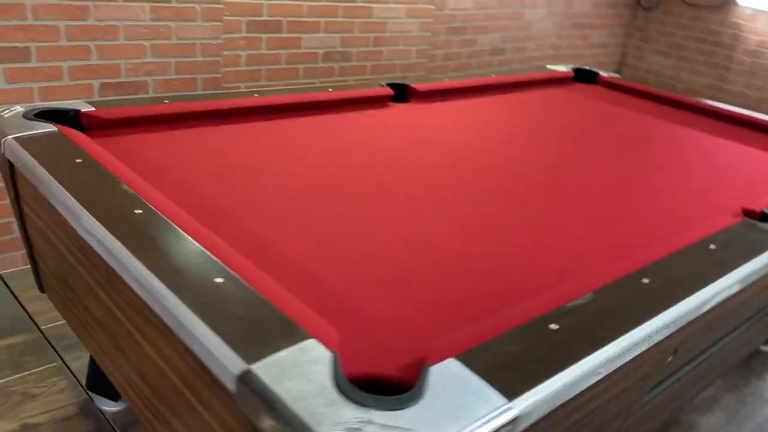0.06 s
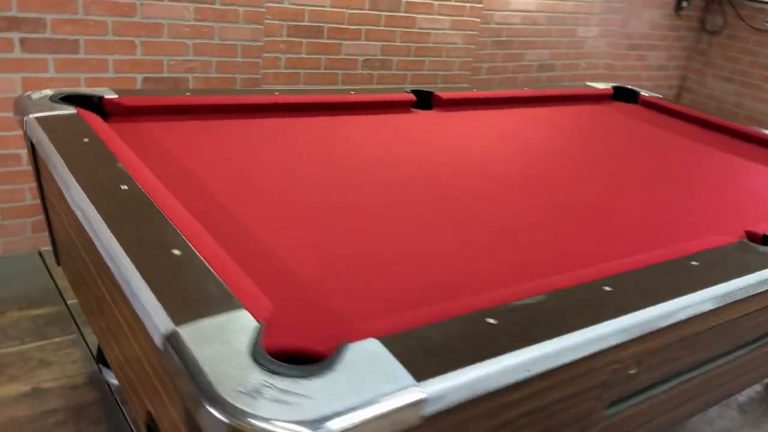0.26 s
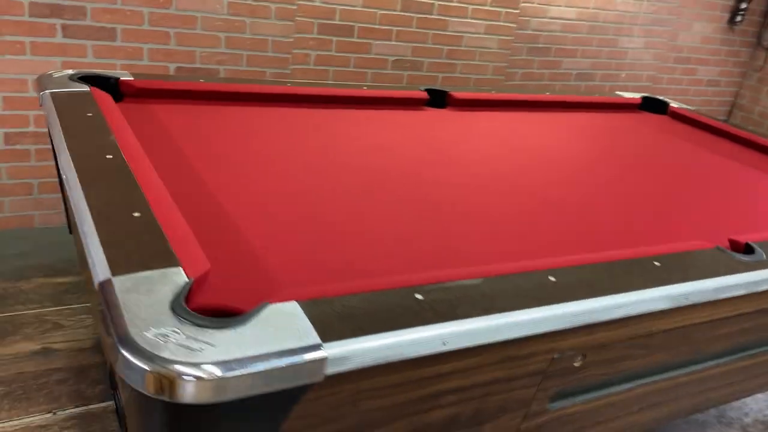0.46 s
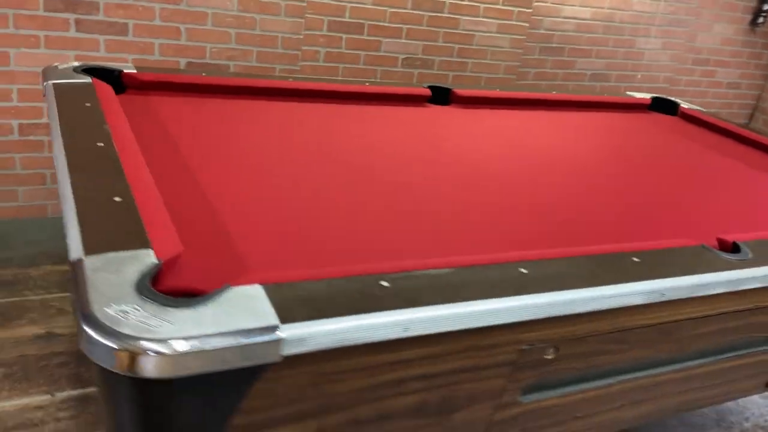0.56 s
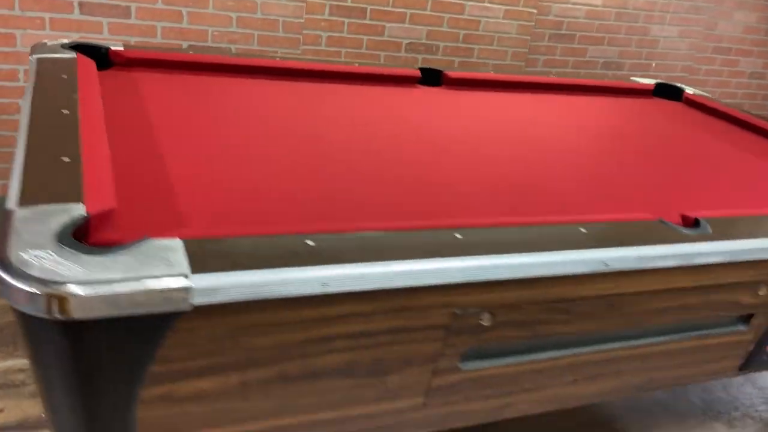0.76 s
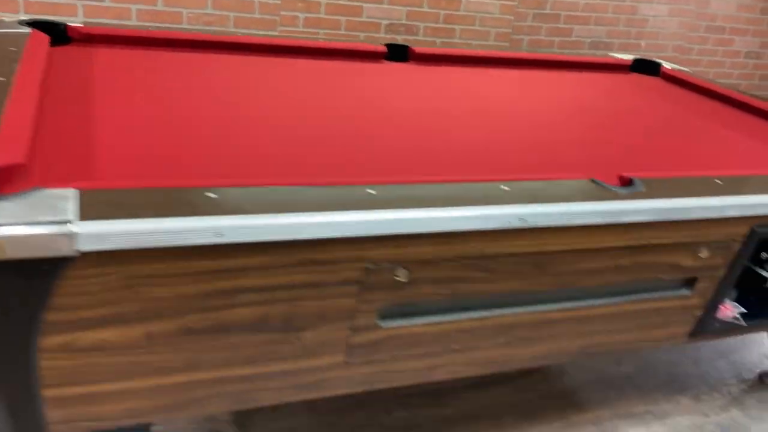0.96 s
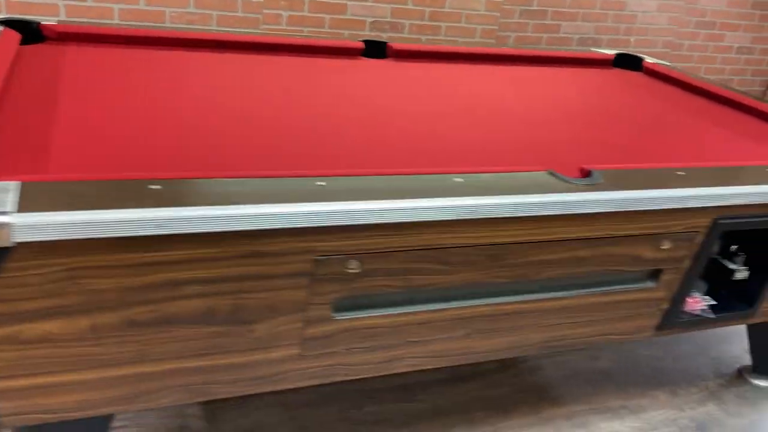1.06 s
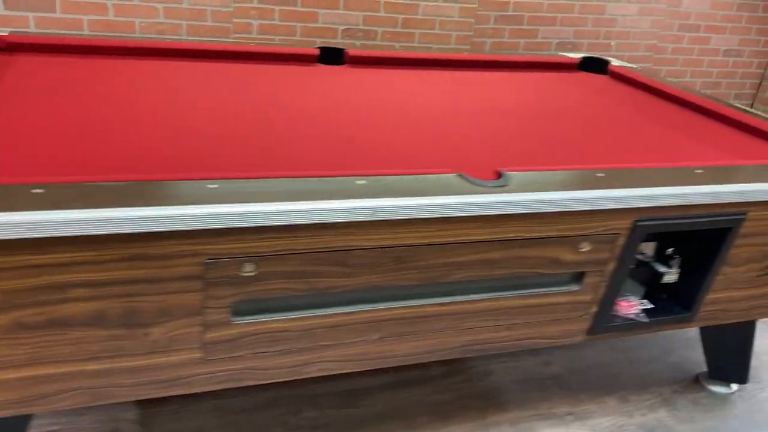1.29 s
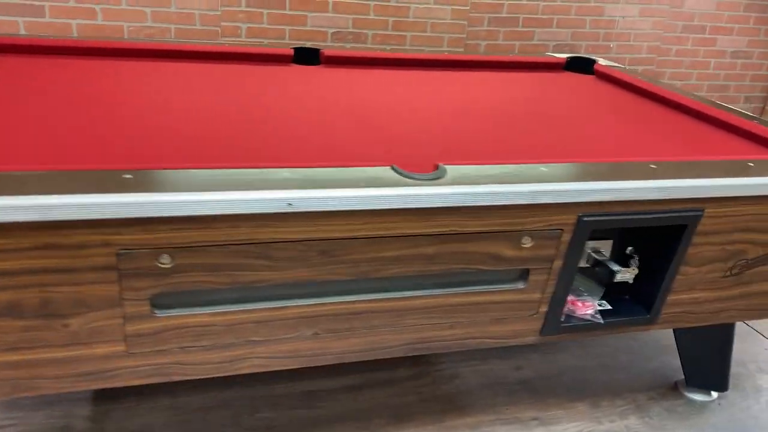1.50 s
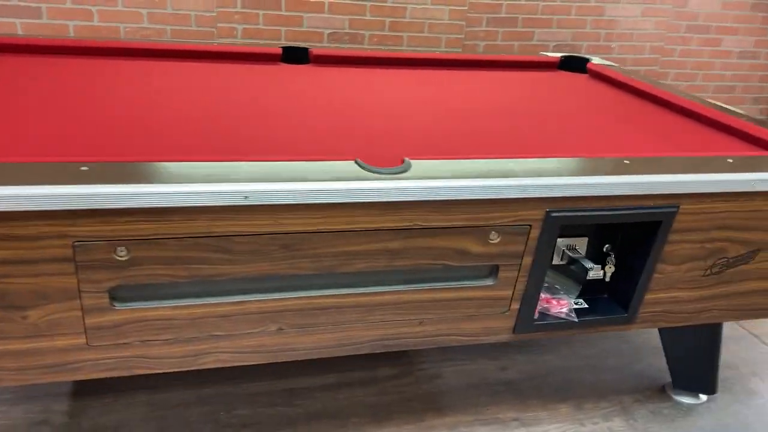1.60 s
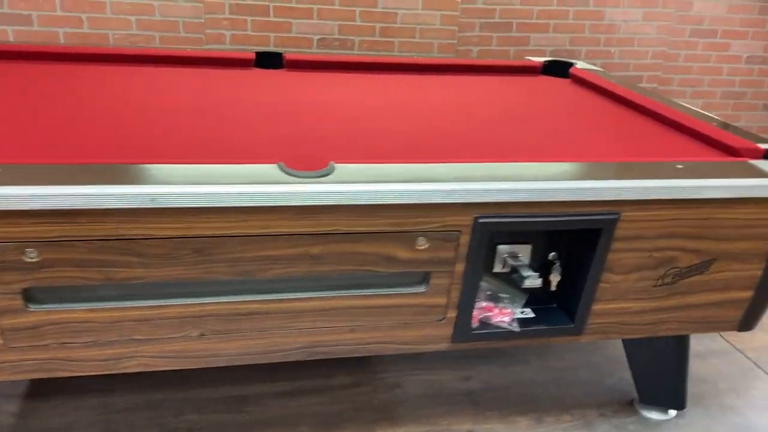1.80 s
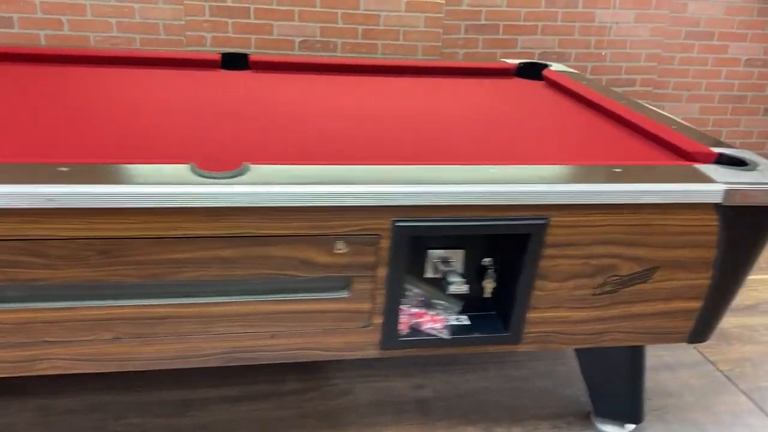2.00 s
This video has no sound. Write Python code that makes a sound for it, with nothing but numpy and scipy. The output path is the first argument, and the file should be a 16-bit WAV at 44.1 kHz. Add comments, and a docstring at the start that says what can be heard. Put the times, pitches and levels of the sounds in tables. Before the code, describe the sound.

Slow footsteps on ringing wooden boards, with faint shoe scuffs over low room noise.

```python
"""Three slow steps on a wooden floor in a quiet room with hard walls.
Low room noise and a thin whine lie under it all. The first heel knocks and sets the boards ringing;
the sole follows with dull thuds and light taps as the floor flexes under the weight, and the walls
answer. The second heel slides with a faint hiss. The third touches softly, then lands harder,
and the last thuds, shoe scuffs and ticks of grit trail off."""
import sys
import numpy as np
from scipy import signal
from scipy.fft import rfft, irfft
from scipy.io import wavfile

SR = 44100
rng = np.random.default_rng(int(sys.argv[2]) if len(sys.argv) > 2 else 0)


def wav_out(sig):
    """Save sig, one row per channel (or a flat mono array), as 16-bit PCM at SR to the path in sys.argv[1]."""
    wavfile.write(sys.argv[1], SR, np.round(np.clip(np.atleast_2d(sig).T, -1, 1) * 32767).astype(np.int16))


N = 90404
TIME = np.arange(N) / SR
CRACK_RISE_S = 0.00013


def from_db(db):
    return 10 ** (np.asarray(db) / 20)


def rms_one(x):
    return x / np.sqrt(np.mean(x ** 2) + 1e-20)


def at_hz(table, hz, column=1):
    """One column of a table, read on a log-frequency axis."""
    table = np.array(table)
    return np.interp(np.log(hz), np.log(table[:, 0]), table[:, column])


def in_time(curve):
    """A level curve joined by straight lines."""
    return np.interp(TIME, *np.transpose(curve))


def pan(db):
    """Stereo gains with the left side louder by db."""
    return from_db([[db / 2], [-db / 2]])


def since(s):
    return np.maximum(TIME - s, 0)


def swell(s, rise, t60):
    """Envelope that rises smoothly from time s and dies away, 60 dB in t60 seconds."""
    return (1 - np.exp(-since(s) / rise)) ** 2 * from_db(-60 * since(s) / t60)


def tone(s, hz):
    return np.sin(2 * np.pi * hz * since(s))


def sinking_tone(s, first_hz, hz, settle_s):
    """A vibration that starts at first_hz and settles on hz."""
    age = since(s)
    extra_cycles = (first_hz - hz) * settle_s * (1 - np.exp(-age / settle_s))
    return np.sin(2 * np.pi * (hz * age + extra_cycles))


def band(x, low_hz, high_hz):
    sos = signal.butter(2, [low_hz, min(high_hz, .47 * SR)], "band", fs=SR, output="sos")
    return signal.sosfilt(sos, x)


def high_pass(x, hz):
    return signal.sosfilt(signal.butter(2, hz, "high", fs=SR, output="sos"), x + 1e-18)


def mic_pair(mid, side, hz):
    """Two unrelated noises as two microphones hear a diffuse sound at this pitch."""
    # Each row: frequency in Hz, likeness of left and right, left minus right in dB.
    image = [(49, 0.94, -1.5), (197, 0.97, 3), (452, 0.33, 0.5), (1010, 0.1, 3.5), (1880, 0.79, -2),
             (3770, 0.19, -5.5), (9500, 0.13, .5)]
    alike = at_hz(image, hz)
    centre = np.sqrt((1 + alike) / 2) * mid
    width = np.sqrt((1 - alike) / 2) * side * [[1], [-1]]
    return pan(at_hz(image, hz, column=2)) * (centre + width)


def noise_bands():
    """Half-octave bands of diffuse stereo noise, each with its centre in Hz."""
    edges = 22 * 2 ** np.arange(0, 9.6, .5)
    white = rng.standard_normal((2, 2, N))
    for k, (low, high) in enumerate(zip(edges, edges[1:])):
        hz = np.sqrt(low * high)
        yield hz, mic_pair(*band(white[k % 2], low, high), hz)


def friction(hz, octaves=1):
    """A stereo band of friction noise."""
    spread = 2 ** (octaves / 2)
    mid, side = band(rng.standard_normal((2, N)), hz / spread, hz * spread)
    return rms_one(mic_pair(mid, side, hz))


def room_noise():
    """A bed of low air noise whose treble rises and falls a little."""
    # Each row: frequency in Hz, relative noise density in dB.
    spectrum = [(25, -6), (48, -1.5), (140, 0.5), (260, -5.5), (500, -14), (1000, -13), (2000, -22.5),
                (7000, -31.5), (15500, -30.5)]
    # Each row: time in seconds, lift of the treble in dB.
    treble_ride = [(0, 2.5), (.23, -7), (.32, 4.5), (.55, -3), (.9, 2), (1.08, -3), (1.27, 1), (1.5, -6),
                   (1.61, 4.5), (1.75, -2.5), (1.95, 1)]
    level_db, treble_from_hz, low_share = -52.5, 2500, 0.47
    lift_db = in_time(treble_ride)
    air = 0
    for hz, noise in noise_bands():
        share = 1 if hz > treble_from_hz else low_share
        air += from_db(at_hz(spectrum, hz) + share * lift_db) * noise
    return from_db(level_db) * rms_one(air)


def whine():
    """A thin electrical whine, louder in some spots of the room than in others."""
    # Each row: pitch in Hz, level in dB relative to the ride.
    partials = [(3472, -3.5), (4047, 0)]
    # Each row: time in seconds, level in dB.
    ride = [(.2, -84), (.32, -76.5), (.64, -78), (.8, -80), (1.2, -85), (1.42, -74.5), (1.52, -87),
            (1.66, -74), (1.8, -86), (2.0, -82)]
    tones = sum(np.sqrt(2) * from_db(db) * tone(0, hz) for hz, db in partials)
    return from_db(in_time(ride)) * tones


def scuffs():
    """Shoes and clothes rub in brief, faint puffs of noise."""
    # Each row: start in seconds, level in dB, centre in Hz, rise and t60 in seconds.
    rubs = [(0.0, -42.5, 205, 0.00022, 0.1), (0.285, -33.5, 1430, 0.015, 0.099),
            (0.249, -55, 3800, 0.0058, 0.31), (0.69, -43, 11600, 0.08, 0.29),
            (0.836, -56, 12000, 0.0026, 0.31), (1.238, -41.5, 1200, 0.013, 0.12),
            (1.376, -60, 4000, 0.00082, 0.74), (1.375, -54.5, 10700, 0.0013, 0.38),
            (1.385, -52.5, 1490, 0.0026, 0.25), (1.576, -48.5, 1800, 0.016, 0.19),
            (1.582, -39, 15000, 0.0082, 0.1), (1.81, -46, 1900, 0.025, 0.17),
            (1.965, -51, 1350, 0.0063, 0.14), (1.935, -36, 217, 0.026, 0.19)]
    return sum(from_db(db) * swell(s, rise, t60) * friction(hz) for s, db, hz, rise, t60 in rubs)


def heels():
    """Each heel knocks, cracks and rings the floor. Returns the direct sound and the reverb send."""
    # Each row: start in seconds, level in dB, board pitch in Hz, t60 in seconds,
    # then floor ring, reverb send and crack in dB relative to that level.
    strikes = [(0.2470, -12, 326, 0.044, -4.5, 4, -12.5), (0.8383, -11.5, 385, 0.038, -17, 0, -16),
               (1.3780, -27, 373, 0.027, -2.5, 2.5, -15), (1.4590, -15.5, 540, 0.029, -11, 0, -23.5)]
    # Each row: pitch of a floor mode in Hz, relative level in dB, t60 in seconds.
    floor_modes = [(141.3, -24, 0.51), (181.8, -21.5, 0.62), (251.3, -15, 0.44), (285.6, -16, 0.49),
                   (389, -20, 0.54), (484, -45, 0.71), (555, -23.5, 0.56), (640, -13, 0.028),
                   (775, -29.5, 0.26), (1273, -16, 0.037)]
    # The crack of a hard contact. Each row: frequency in Hz, relative noise density in dB.
    crack_spectrum = [(200, 7.5), (1100, -3), (1500, -16.5), (2100, -11.5), (3000, -46), (8000, -38.5)]
    crack_noise = rms_one(sum(from_db(at_hz(crack_spectrum, hz)) * noise for hz, noise in noise_bands()))
    direct, send = 0, 0
    for s, db, hz, t60, ring_db, send_db, crack_db in strikes:
        # Bending waves bring the highs first, so the knock drops to the board's pitch.
        bending = sinking_tone(s, first_hz=1620, hz=hz, settle_s=0.0013)
        knock = swell(s, rise=0.0014, t60=t60) * bending
        ring = sum(from_db(ring_db + mode_db) * swell(s, rise=0.0013, t60=mode_t60) * tone(s, mode_hz)
                   for mode_hz, mode_db, mode_t60 in floor_modes)
        crack = from_db(crack_db) * swell(s, CRACK_RISE_S, t60=0.1) * crack_noise
        direct += from_db(db) * (pan(db=5) * (knock + ring) + crack)
        send += from_db(db + send_db) * knock
    return high_pass(direct, hz=134), send


def room_reverb(send):
    """The hard walls return a diffuse tail that builds quickly and dies band by band."""
    # Each row: frequency in Hz, reverb level in dB, t60 in seconds.
    reverb = [(56.6, -10, 0.97), (146, 4, 0.54), (289, -4.5, 0.46), (700, -7, 0.61), (1180, 2, 0.49),
              (2620, 14, 0.67)]
    response = 0
    for hz, noise in noise_bands():
        decay = swell(0, rise=0.00083, t60=at_hz(reverb, hz, column=2))
        response += from_db(at_hz(reverb, hz)) * noise * decay / np.sqrt(np.sum(decay ** 2))
    return signal.fftconvolve(send[None], response, axes=1)[:, :N]


def sole_thuds():
    """The weight comes down softly and the boards swing for a few cycles, sinking in pitch."""
    # Each row: start in seconds, level in dB, final pitch in Hz, t60 in seconds.
    thuds = [(0.249, -16, 222, 0.035), (0.266, -18.5, 265, 0.055), (0.27, -27.5, 171.3, 0.1),
             (0.271, -23, 456, 0.026), (0.299, -14, 303, 0.019), (0.299, -34, 76, 0.16),
             (0.324, -26, 328, 0.069), (0.359, -22.5, 332, 0.028), (0.394, -25.5, 48, 0.077),
             (0.595, -27.5, 53.7, 0.061), (0.724, -40, 328.6, 0.12), (0.8379, -25, 205, 0.047),
             (1.254, -40, 290, 0.048), (1.391, -25, 251, 0.036), (1.462, -32, 428, 0.13),
             (1.467, -18, 227, 0.034), (1.474, -26, 155, 0.06), (1.484, -19, 258, 0.03),
             (1.615, -30, 420, 0.025), (1.624, -12.5, 231.5, 0.037), (1.647, -22, 253.6, 0.046),
             (1.668, -22, 50.6, 0.1), (1.977, -44, 111, 0.034)]
    rise_cycles, sharp_ratio = 0.43, 1.096
    boards = 0
    for s, db, hz, t60 in thuds:
        flex = sinking_tone(s, hz * sharp_ratio, hz, settle_s=0.0051)
        boards += from_db(db) * swell(s, rise_cycles / hz, t60) * flex
    return boards


def sole_taps():
    """The sole's edge taps as it rolls down, each contact a brief knock with a broad crack."""
    # Each row: start in seconds, level in dB, pitch in Hz.
    taps = [(0.314, -24, 1027), (0.3345, -28, 760), (0.3575, -25.5, 1136), (0.8810, -30.5, 980),
            (0.9627, -34.5, 1020), (1.4650, -28.5, 930), (1.5215, -36, 777)]
    rise_s = 0.00019
    crack_noise = from_db(-14.5) * rms_one(band(rng.standard_normal(N), low_hz=556, high_hz=1480))
    contacts = 0
    for s, db, hz in taps:
        knock = swell(s, rise_s, t60=0.018) * tone(s, hz)
        crack = swell(s, rise_s, t60=0.028) * crack_noise
        contacts += from_db(db) * (knock + crack)
    return contacts


def grit():
    """Grit under the shoe gives tiny, crisp ticks."""
    # Each row: start in seconds, level in dB, centre in Hz.
    ticks = [(0.748, -47.5, 2600), (1.601, -41.5, 12040), (1.935, -48, 9400), (1.993, -47, 13900)]
    return sum(from_db(db) * swell(s, CRACK_RISE_S, t60=0.011) * friction(hz) for s, db, hz in ticks)


def heel_slide():
    """The second heel slides with a narrow, bright hiss."""
    return from_db(-54) * swell(s=0.838, rise=0.00055, t60=0.36) * friction(hz=5820, octaves=0.38)


def scene():
    """The steps and their reverb over the quiet room."""
    heel, heel_send = heels()
    thud, tap = sole_thuds(), sole_taps()
    sole = pan(db=3.5) * (thud + tap)
    tail = room_reverb(heel_send + from_db(-4.5) * thud + from_db(-7.5) * tap)
    return heel + sole + tail + scuffs() + grit() + heel_slide() + room_noise() + whine()


def record(dry):
    """The microphones shed deep bass and the very top, dip the treble twice and hear the left late."""
    # Each row: centre in Hz, half width in Hz, gain in dB.
    treble_dips = [(8970, 950, -9.5), (13140, 2060, -9.5)]
    low_cut_hz, high_cut_hz, left_lag_s = 28.6, 15780, 0.000026
    hz = np.arange(N + 1) * SR / (2 * N)
    colour = from_db(sum(db * np.exp(-((hz - centre) / width) ** 2) for centre, width, db in treble_dips))
    high_cut = 1 / np.sqrt(1 + (hz / high_cut_hz) ** 600)
    lag = np.exp(-2j * np.pi * hz * left_lag_s * np.array([[1], [0]]))
    spectrum = rfft(high_pass(dry, low_cut_hz), 2 * N)
    return irfft(spectrum * colour * lag * high_cut)[:, :N]


dry = scene()
out = record(dry)
wav_out(out)
```